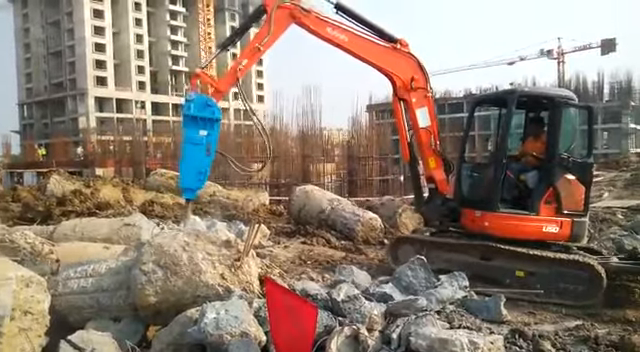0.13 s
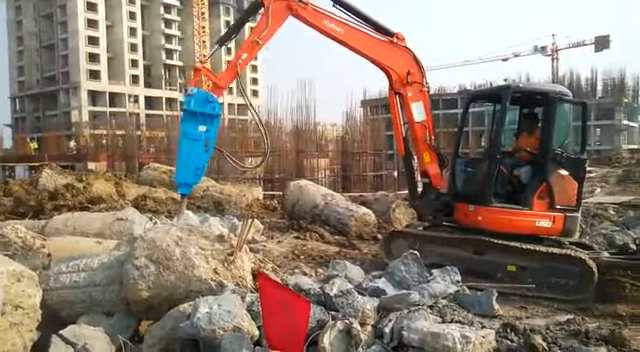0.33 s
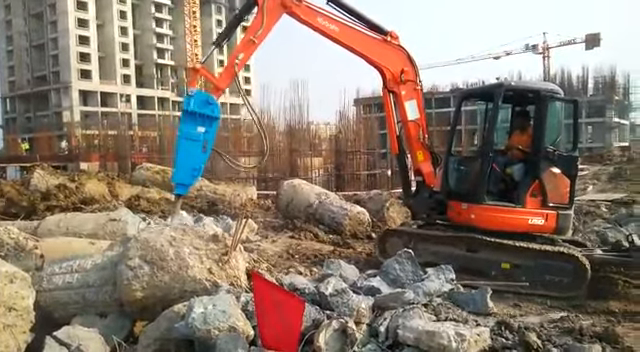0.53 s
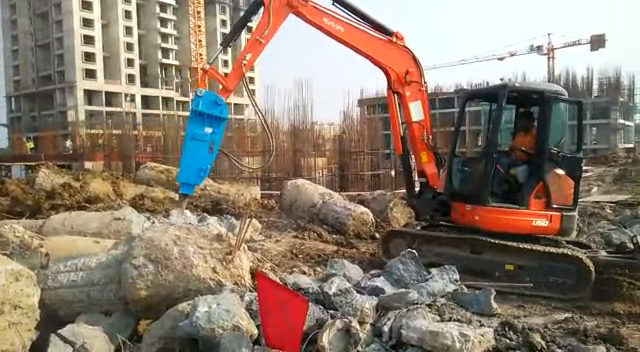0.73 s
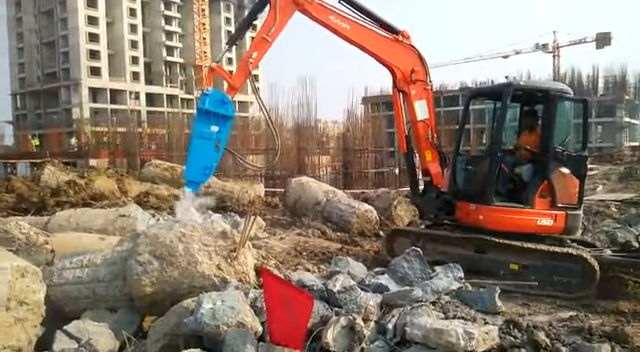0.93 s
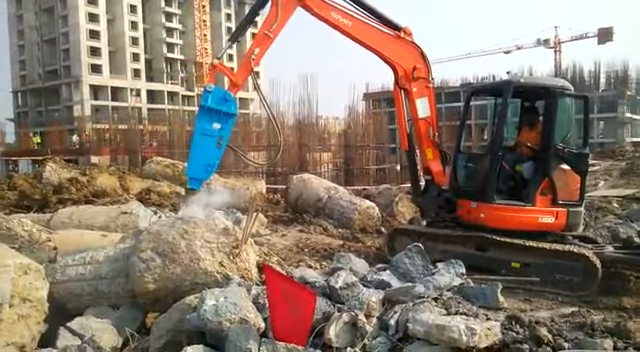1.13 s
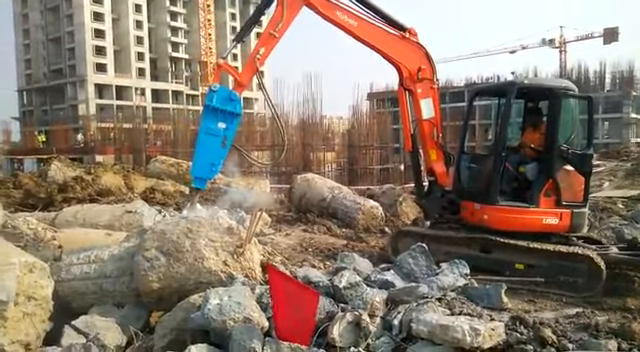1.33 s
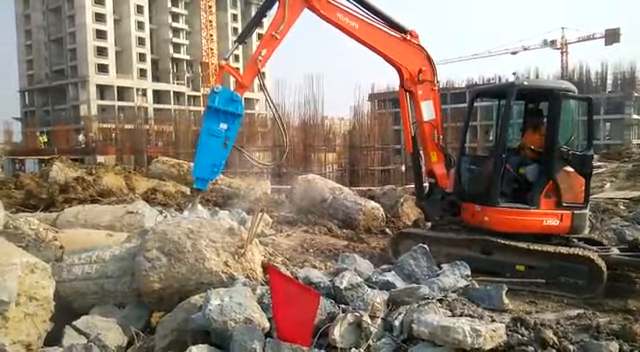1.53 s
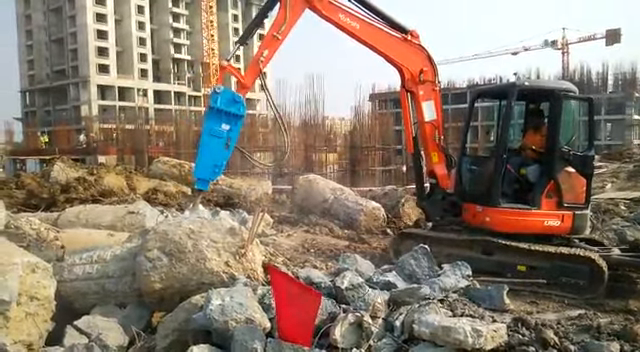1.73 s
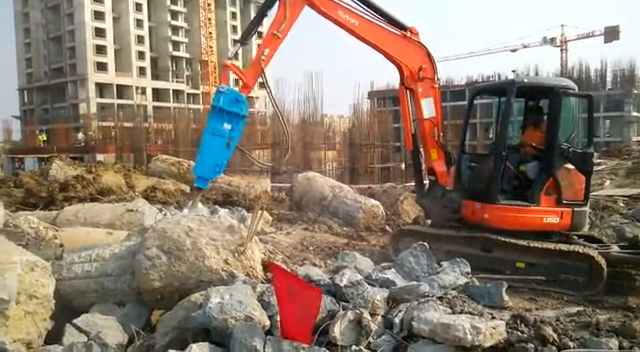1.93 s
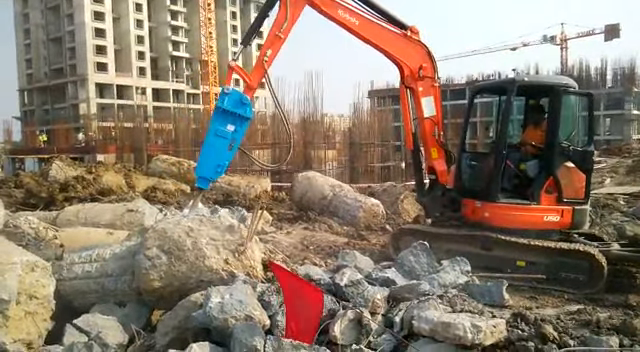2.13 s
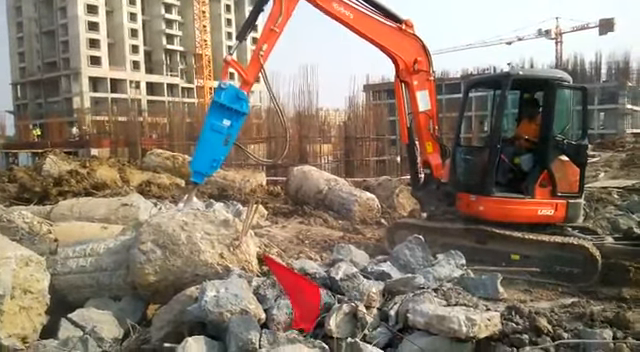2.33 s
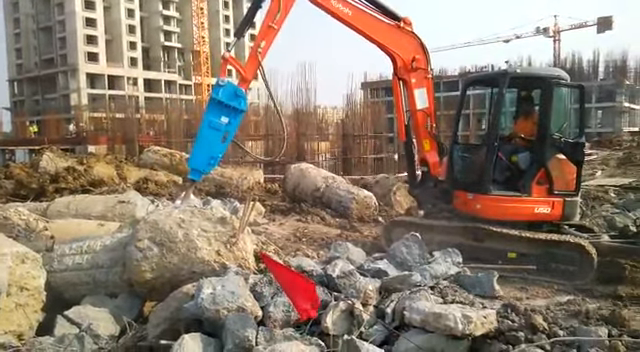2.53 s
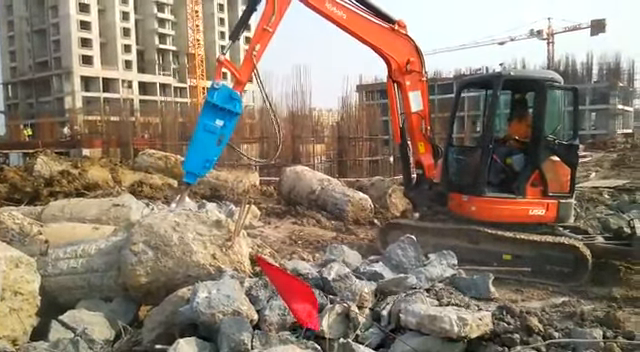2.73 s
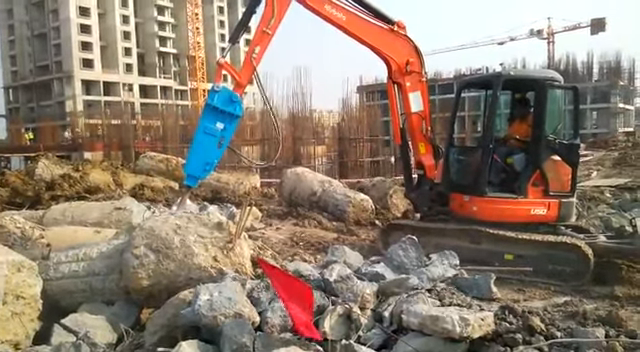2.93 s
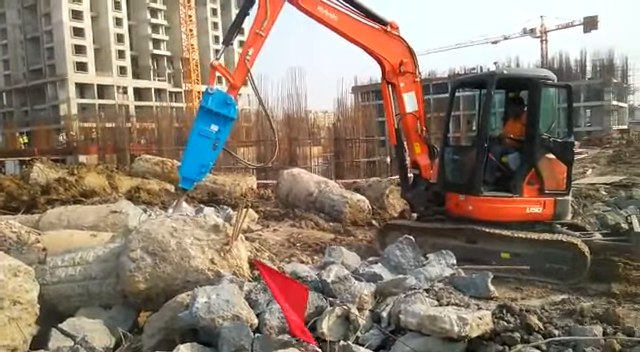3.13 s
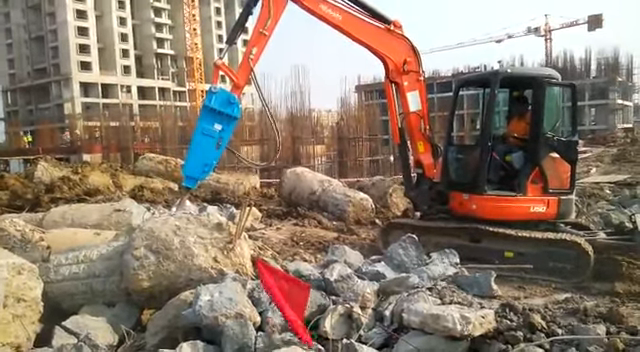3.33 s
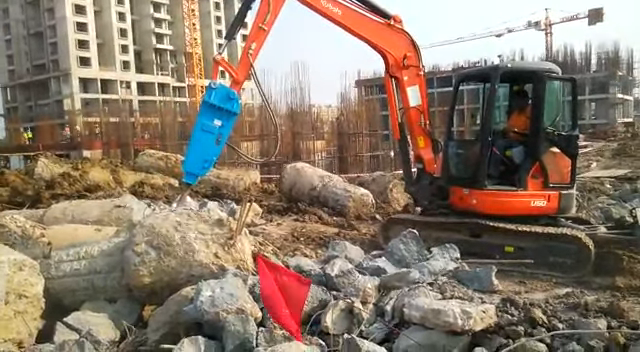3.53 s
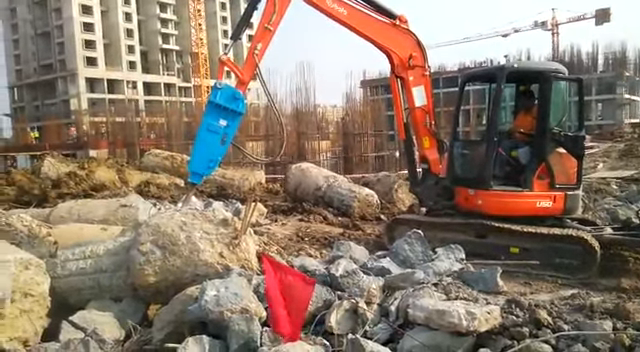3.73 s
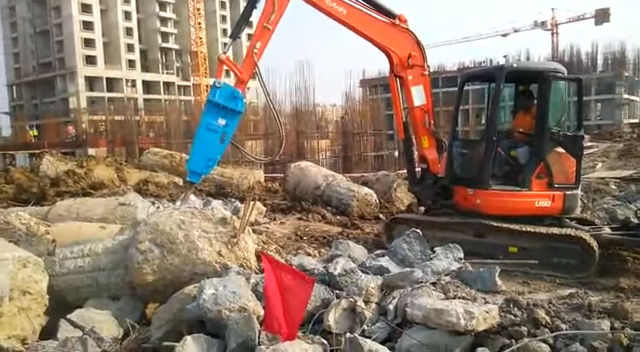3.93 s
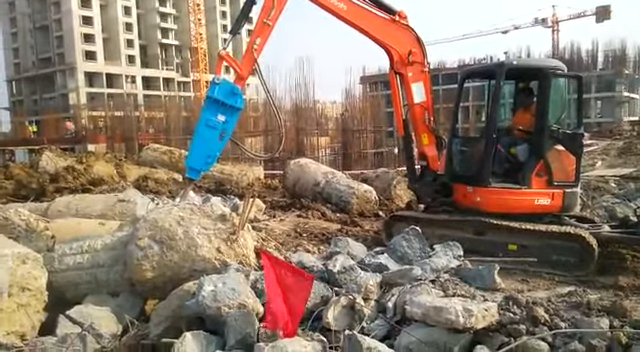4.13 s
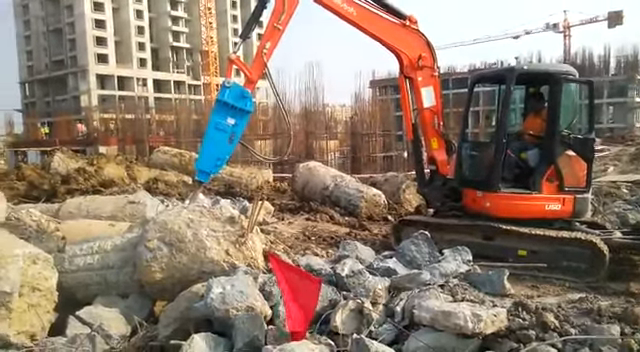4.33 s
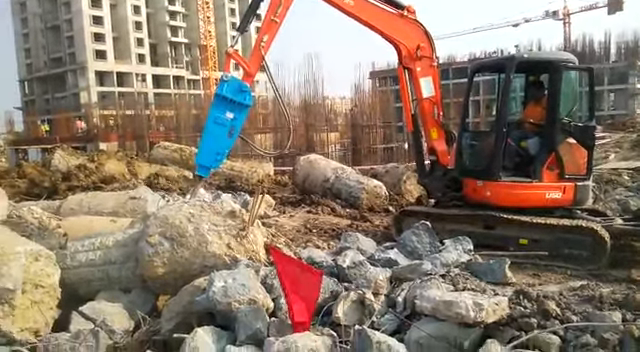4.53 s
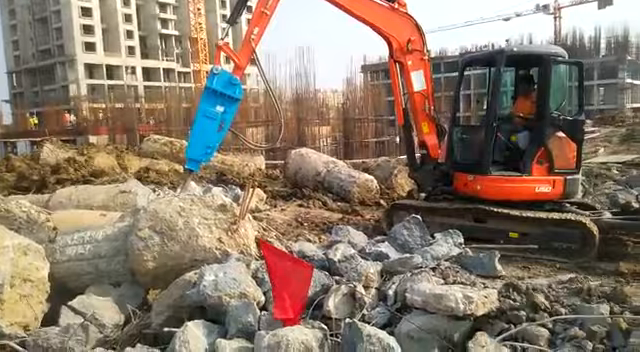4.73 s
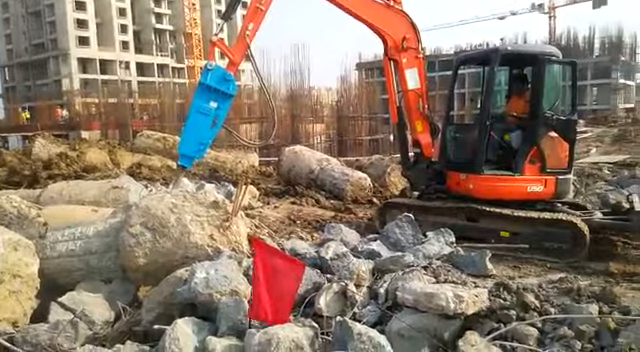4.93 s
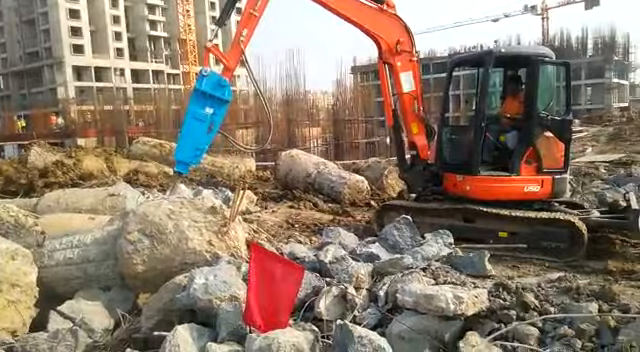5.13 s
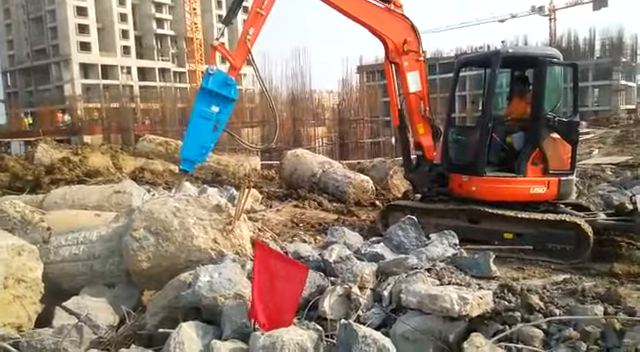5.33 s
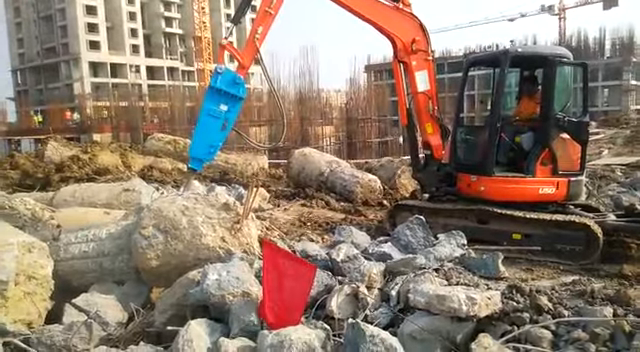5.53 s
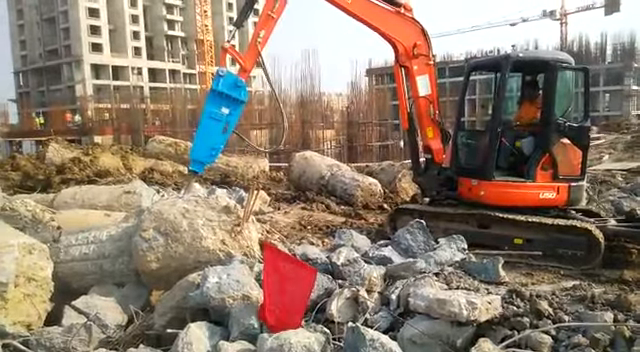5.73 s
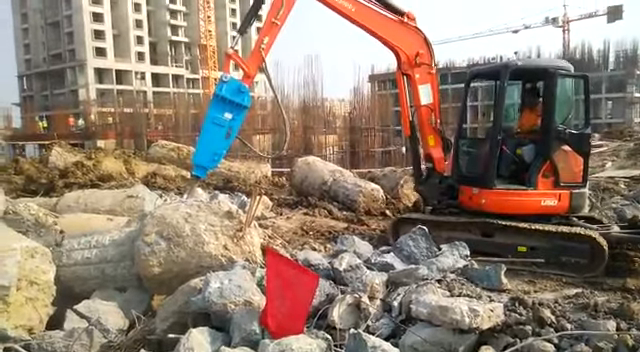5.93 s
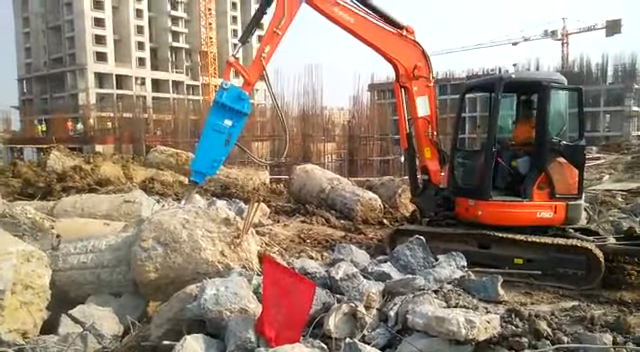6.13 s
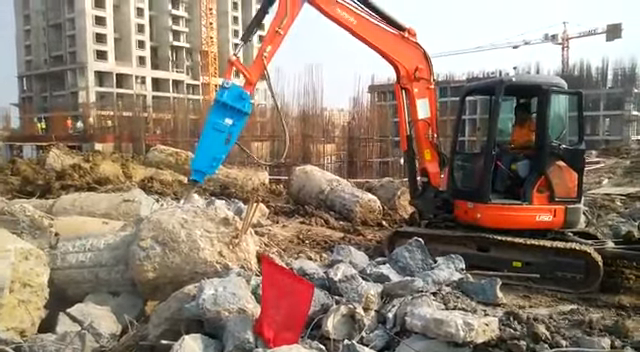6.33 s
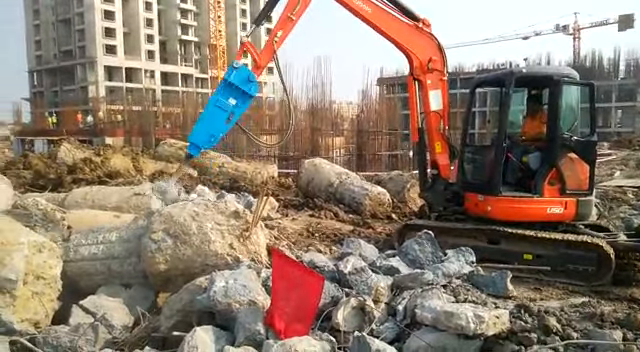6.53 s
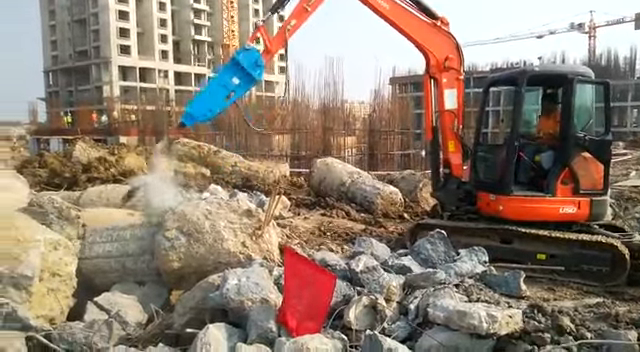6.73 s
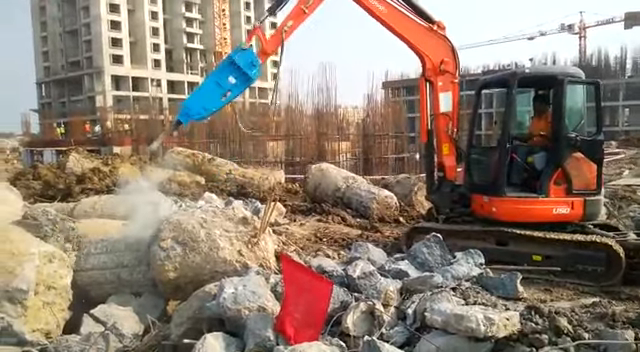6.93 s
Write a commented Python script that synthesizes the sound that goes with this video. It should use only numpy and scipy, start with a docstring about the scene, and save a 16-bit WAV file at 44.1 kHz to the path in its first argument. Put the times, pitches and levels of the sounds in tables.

```python
"""A hydraulic breaker hammers concrete: uneven volleys with skidding zings, falling chunks and knocks.
From 3.2 s it locks into a steady run, eases off after 5.3 s and stops at 5.8 s.
Each blow sums shaped noise (strike, rebound, clink, rattle, thud), decaying steel modes and chip clicks.
In the pause the diesel idles and the arm knocks; from 6.7 s the chisel slides off with two glancing blows.
Diesel, pump, oil and ground are filtered noise and sines; a short noise tail is the site's answer."""
import sys
import numpy as np
from scipy import signal
from scipy.fft import rfft, irfft, next_fast_len
from scipy.io import wavfile
from scipy.ndimage import map_coordinates

SR = 44100
rng = np.random.default_rng(int(sys.argv[2]) if len(sys.argv) > 2 else 0)


def wrap_up_sound(samples):
    """Save the sound to the file named by the first command line argument, as 16-bit audio."""
    columns = np.atleast_2d(samples).T
    # keep every value between -1 and 1, then stretch to whole-number steps
    tamed = np.clip(columns, -1, 1)
    steps = np.round(tamed * 32767).astype(np.int16)
    wavfile.write(sys.argv[1], SR, steps)


N = 311787
LENGTH = SR * 2 // 5  # samples in one event
AGE_S = np.arange(LENGTH) / SR

# piston volleys: (start [s], blows, first gap [s], change of gap per blow [s])
VOLLEYS = [(.004, 1, 0, 0), (.101, 4, .103, .0093), (.578, 3, .138, -.029), (.921, 5, .094, -.002),
           (1.38, 4, .101, -.008), (1.741, 4, .082, .0075), (2.116, 4, .105, -.006), (2.489, 1, 0, 0),
           (2.896, 3, .099, -.017), (3.157, 32, .07297, 0), (5.499, 3, .091, -.001), (5.786, 1, 0, 0)]
# chisel seating in the concrete: (time [s], seat [0-1])
SEAT = [(0, 0.1), (1.9, 0.08), (2.3, 0.08), (2.5, 0.9), (2.9, 0.91), (3.2, 1), (5.4, 1), (5.8, 1)]
# free ringing of the chisel as the surface crumbles: (time [s], ring [dB])
FREE_RING = [(0, -11.5), (.6, -19), (.9, -7.5), (1.1, 5), (1.5, 5.5), (1.9, 1), (2.15, -34), (2.5, 1),
             (2.9, -1), (3.2, -10), (5, -2), (5.8, -15)]
# bite of the tip on the rebound: (time [s], level [dB])
BITE = [(.1, -0.5), (.6, 0.7), (.87, 3), (1.15, -1), (1.5, -2.5), (2.4, 0), (3.3, 1.7), (4.3, 1.8)]
# casing plates ringing as the arm leans on them: (time [s], level [dB])
PLATE_RING = [(.1, 2.5), (.45, -1), (.85, -9), (1.3, -0.5), (2, 1.5), (2.9, -4.5), (3.5, -3.5), (5.2, -6)]
# casing plate modes: (frequency [Hz], relative level [dB], t60 [s], gain when seated [dB])
PLATE_MODES = [(234.4, -21.5, 0.29, 1), (348.7, -16.5, 0.27, -4), (467.3, -18.5, 0.63, 7),
               (563.1, -20.5, 0.24, 13), (730.7, -10, 0.094, 18.5), (785.3, 8.5, 0.14, -15),
               (797.4, -4.5, 0.28, 9.5), (997.6, -9.5, 0.27, 6), (1285, -18.5, 0.23, 13.5),
               (1400, -17, 0.19, 22), (1438, -10.5, 0.12, 19.5), (1503.6, -5, 0.14, 19.5),
               (1525, -13, 0.22, 18.5), (1753, -17.5, 0.07, 25.5), (1830, -5, 0.18, 4),
               (2220, -1.5, 0.088, 7), (2593, -3, 0.12, 5), (2842, -4, 0.13, 5.5)]
# chisel modes: (frequency [Hz], relative level [dB], t60 [s], share of free ringing [ratio])
CHISEL_MODES = [(2352, -10, .2, 1), (2467, -3, .25, 1), (4904, -10, .2, 1), (5032, -8, .2, .8),
                (5259, -2, .25, .8), (7075, -7, .2, .6), (7135, -8, .2, .2), (7372, -8, .18, .8),
                (9360, -8, .15, .6), (10403, -7, .2, .1), (14000, -14, .12, 0)]
# piston strike spectrum: (frequency [Hz], relative level [dB])
STRIKE_COLOUR = [(300, -14), (1000, 0), (2600, -2.5), (3300, -27), (3900, -6), (5100, 5.5), (6200, 2.5),
                 (7100, 7), (7800, 2.5), (9000, 4.5), (11200, 5.5), (12800, 1), (14100, -7.5)]
# rebound spectrum: (frequency [Hz], relative level [dB])
REBOUND_COLOUR = [(2500, -53), (3900, -17), (4300, 3.5), (5150, 2.5), (6200, 2), (7150, 14), (7850, 4.5),
                  (8600, 8), (10400, 9), (11600, 5), (13300, -3.5), (14100, -11.5)]
# chisel sleeve spectrum: (frequency [Hz], relative level [dB])
SLEEVE_COLOUR = [(3300, -78), (3560, -46), (3650, 13.5), (3880, 3), (3970, 3), (4200, -29)]
# casing rattle spectrum: (frequency [Hz], relative level [dB])
CASING_COLOUR = [(150, -39), (300, -4.5), (450, -2.5), (620, 6.5), (850, 8.5), (1200, 3.5), (1800, 2.5),
                 (2100, 1.5), (2600, 3), (3400, -3), (3750, -0.5), (3980, -8), (6000, -50)]
# boulder thud spectrum: (frequency [Hz], relative level [dB])
THUD_COLOUR = [(15, -45), (25, -38), (70, -16), (160, -12.5), (250, 3), (380, 7.5), (600, -4.5),
               (1500, -46)]
# glancing contact spectrum: (frequency [Hz], relative level [dB])
GLANCE_COLOUR = [(59, -67), (100, -46), (225, -23), (349, -4), (665, -4), (836, -3), (1190, -1), (2860, -4),
                 (3910, -20), (4330, -11.5), (5230, -13), (9970, -9), (14500, -22)]
# chisel sliding off: (time [s], level [dB], rise [s], t60 [s])
SLIPS = [(6.659, -24, 0.016, 0.12), (6.712, -14, 0.0013, 0.21), (6.791, -18, 0.0009, 0.23),
         (7.02, -57, 0.019, .5)]
# chisel skids: (time [s], level [dB], frequency [Hz], t60 [s])
ZINGS = [(.745, -17, 7380, .084), (.85, -16, 7500, 0.16), (0.939, -17.5, 7490, .4),
         (0.996, -25, 4820, 0.33), (1.046, -17, 7270, .22), (1.07, -25.5, 4770, 0.54),
         (1.136, -16.5, 7100, 0.16), (1.224, -15.5, 7100, 0.11), (1.51, -16.5, 5120, 0.15),
         (2.13, -12, 10450, 0.15), (2.15, -21, 7320, 0.21), (2.24, -18.5, 10530, 0.14),
         (2.25, -22.5, 7350, 0.19), (2.515, -17, 7100, 0.074)]
# loose stone, arm joints and the resonances of the glancing blows:
# (time [s], level [dB], frequency [Hz], width [Hz], t60 [s])
KNOCKS = [(2.655, -40, 3500, 91, 0.14), (2.755, -43, 300, 60, .49), (2.875, -33.5, 246, 50, 0.36),
          (5.956, -40, 4000, 500, .077), (5.985, -36.5, 187, 90, 0.18), (6.10, -44, 626, 70, 1),
          (6.117, -36, 344, 60, 0.3), (6.195, -33.5, 1060, 170, 0.15), (6.2, -34, 318, 120, 0.16),
          (6.258, -41, 1010, 170, .18), (6.385, -40, 189, 80, 0.37), (6.44, -35, 172, 55.3, 0.13),
          (6.445, -36, 560, 110, 0.16), (6.66, -21.5, 775, 68, 0.77), (6.664, -26, 1430, 90, .29),
          (6.712, -28, 310, 70, .2), (6.795, -24, 4510, 88.5, .12), (6.972, -26.5, 735, 260, 0.08),
          (6.974, -25, 1490, 690, 0.08)]
# broken chunks dropping: (time [s], level [dB])
CHUNKS = [(.77, -36), (.97, -35), (1.1, -30), (1.17, -30), (1.26, -30), (1.901, -36), (2.1, -39),
          (5.562, -32.5)]
# diesel, idling then taking up the arm's load: (time [s], level [dB])
ENGINE_LEVEL = [(6.3, -47), (6.6, -42.5), (6.72, -28.5), (6.95, -39), (7.07, -26)]
# diesel spectrum: (frequency [Hz], relative level [dB])
DIESEL_COLOUR = [(15, -89), (25, -73), (133, -26), (192, -34), (353, -4.5), (485, -34.5), (616, -13.5),
                 (824, -12.5), (1020, -18.5), (1290, -23), (3440, -23), (4250, -33), (14000, -62.5)]
# pump whine partials: (frequency [Hz], relative level [dB])
PUMP_PARTIALS = [(355, -16.5), (711, -5), (2444, -19.5), (3354, -16)]
# oil hiss spectrum: (frequency [Hz], relative level [dB])
OIL_COLOUR = [(2000, -8.5), (3400, -18), (6500, -19.5), (9500, 6.5), (12000, -26), (14000, -28.5)]
# arm moves: (start [s], length [s], pump whine [dB], oil hiss [dB])
ARM_MOVES = [(2.543, 0.059, -47.5, -78.5), (6.343, 0.16, -44.5, -69.5), (6.594, 0.3, -43, -45.5),
             (6.9, .17, -38, -81)]
# ground rumble spectrum: (frequency [Hz], relative level [dB])
GROUND_COLOUR = [(15, -58), (30, -34), (55, -30), (85, 0), (140, 1.5), (220, 5), (400, -16.5),
                 (1000, -61.5)]
# decay of the site's answer: (frequency [Hz], t60 [s])
SITE_DECAY = [(200, 0.67), (1000, 0.33), (4000, 0.24), (12000, 0.26)]
# left-right difference filter: (frequency [Hz], gain [dB])
SIDE_FILTER = [(2000, -84.5), (3300, -62), (4800, -36.5), (8500, -3), (14000, -5.5)]

# base levels, before pace, seat, bite and scatter
STRIKE_DB, REBOUND_DB, CASING_DB, THUD_DB = -12.5, -17, -19, -32
FULL_GAP_S, SLOWEST_GAP_S, WEAKER_DB_PER_S = 0.087, 0.15, 277  # longer gaps: softer strikes
SEAT_DAMPS_DB = 1.5  # a seated chisel steadies the casing
THUD_DB_PER_FREE_DB = 0.42  # a crumbling boulder thuds more
EASE_START_S, EASE_DB_PER_S = 5.32, 8  # the arm eases off
BLOW_SCATTER_DB, THUD_SCATTER_DB = 1.1, 0.5
REBOUND_DELAY_S, LOOSE_DELAY_S = 0.014, 0.0007  # after the strike; extra when loose
CHATTER_S, LOOSE_CHATTER_S = 0.0069, 0.02  # hold of the tip's chatter; extra when loose
SNAP_DB, SNAP_T60_S = 0.5, 0.0071  # hard first contact of the rebound, relative to its chatter
CHISEL_DETUNE_RATIO = 0.00355  # the load on the tip shifts its modes from blow to blow
ZING_WIDTH_HZ = 170
VALVE_RISE_S, VALVE_T60_S, IDLE_WHINE_DB, IDLE_HISS_DB = 0.02, 0.19, -79, -68.5
WHINE_WAVER_DB = 3
GROUND_DB, SHAKE_DB, SHAKE_T60_S, CHUNK_T60_S = -72.5, -57.5, 0.41, 0.2  # at rest; under blows; chunks
TOP_HZ = 14420  # band limit


def amp(db):
    """Decibels to gain."""
    return 10 ** (np.asarray(db) / 20)


def unit(x):
    """Scale to rms 1."""
    return x / np.sqrt(np.mean(x ** 2) + 1e-20)


def along(points, hz):
    """Interpolate (frequency, value) points on a log axis."""
    f, v = np.transpose(points)
    return np.interp(np.log(hz + 1), np.log(f + 1), v)


def at(rows, s):
    """The columns of a curve at the times s."""
    times, *cols = np.transpose(rows)
    return [np.interp(s, times, c) for c in cols]


def filtered(x, response):
    """Multiply the spectrum of x by a response of frequency."""
    size = x.shape[-1]
    m = next_fast_len(size + 4096)
    return irfft(rfft(x, m) * response(np.fft.rfftfreq(m, 1 / SR)), m)[..., :size]


def noise(colour, shape, ragged_db, grain_hz):
    """Coloured noise of rms 1; random bumps about grain_hz wide stand for many small resonances."""
    white = rng.standard_normal(shape)
    knots = rng.standard_normal(white.shape[:-1] + (2000,))

    def response(hz):
        place = np.minimum(hz / grain_hz, knots.shape[-1] - 2)
        k = place.astype(int)
        bumps = knots[..., k] * (k + 1 - place) + knots[..., k + 1] * (place - k)
        ragged = ragged_db * np.tanh(bumps) * np.minimum(hz / 2500, 1)  # smoother below 2500 Hz
        return amp(along(colour, hz) + ragged)

    return unit(filtered(white, response))


def wobble(rate_hz):
    """A smooth random curve through rate_hz knots a second."""
    knots = rng.standard_normal(int(N * rate_hz / SR) + 4)
    return map_coordinates(knots, [np.arange(N) * rate_hz / SR])


def burst(delay_s, rise_s, hold_s, t60_s):
    """An envelope that waits, rises, holds and decays exponentially."""
    t = np.maximum(AGE_S - delay_s, 0)
    return (1 - np.exp(-t / rise_s)) * amp(-60 * np.maximum(t - hold_s, 0) / t60_s)


def add(track, s, sound):
    """Mix a sound into a track at time s."""
    part = track[max(round(s * SR), 0):][:len(sound)]
    part += sound[:len(part)]


def dense_ring(colour, alike, ragged_db, grain_hz):
    """Countless close modes, a row per blow: the steel answers alike, the contact adds chance."""
    rows = noise(colour, (len(alike) + 1, LENGTH), ragged_db, grain_hz)
    share = np.clip(alike, 0, 1)[:, None]
    return np.sqrt(share) * rows[0] + np.sqrt(1 - share) * rows[1:]


def ring(hz, levels_db, t60_s, phase, scatter_db, slack_rad):
    """A few decaying sine modes; strength varies per blow, and phase through slack in the joints."""
    gains = amp(levels_db + scatter_db * rng.standard_normal(len(hz)))
    phase = phase + slack_rad * rng.standard_normal(len(hz))
    decay = amp(-60 * AGE_S / t60_s[:, None])
    return gains @ (decay * np.sin(2 * np.pi * hz[:, None] * AGE_S + phase[:, None]))


def resonances(rows, rise_s):
    """Each contact excites one broad resonance, made of filtered noise."""
    out = np.zeros(N)
    for s, db, hz, width_hz, t60_s in rows:
        white = rng.standard_normal(LENGTH)
        tone = filtered(white, lambda f: 1 / (1 + (2 * (f - hz) / width_hz) ** 2))
        shape = burst(0, rise_s, 2 * rise_s, t60_s)
        add(out, s, amp(db) * unit(tone * shape) * np.sqrt(np.mean(shape ** 2)))
    return out


def blow_times():
    """Within a volley each gap differs from the last by a fixed step."""
    return np.array([start + k * gap + k * (k - 1) / 2 * step
                     for start, count, gap, step in VOLLEYS for k in range(count)])


def blows():
    """Pace and contact set each blow: columns (time [s], strike, rebound, casing, thud [dB])."""
    s = blow_times()
    (seat,), (free_db,), (bite_db,) = at(SEAT, s), at(FREE_RING, s), at(BITE, s)
    gaps = np.pad(np.minimum(np.diff(s), SLOWEST_GAP_S), 1, mode="edge")
    slowness = np.maximum((gaps[:-1] + gaps[1:]) / 2 - FULL_GAP_S, 0)
    eased_db = EASE_DB_PER_S * np.maximum(s - EASE_START_S, 0)
    chance = rng.standard_normal((len(s), 3)).T
    weaker_db = np.maximum(WEAKER_DB_PER_S * slowness, eased_db)
    strike_db = STRIKE_DB - weaker_db + BLOW_SCATTER_DB * chance[0]
    rebound_db = REBOUND_DB + bite_db - eased_db + BLOW_SCATTER_DB * chance[1]
    casing_db = CASING_DB - SEAT_DAMPS_DB * seat + BLOW_SCATTER_DB * chance[2]
    thud_db = THUD_DB + THUD_DB_PER_FREE_DB * free_db + THUD_SCATTER_DB * chance[2]
    return s, strike_db, rebound_db, casing_db, thud_db


def strikes(seat):
    """The piston hits the chisel: bright dense ringing, more alike when seated."""
    return dense_ring(STRIKE_COLOUR, 0.3 + 0.35 * seat, 7, 160) * burst(-0.0017, 0.0027, 0.0037, 0.081)


def rebounds(seat, loose, back_s):
    """The chisel rebounds: a hard snap and chatter, held longer when loose."""
    hold_s = CHATTER_S + LOOSE_CHATTER_S * loose
    envelope = 0.73 * burst(back_s, 0.0025, hold_s, 0.22 - 0.056 * loose)
    chatter = dense_ring(REBOUND_COLOUR, 0.27 + 0.27 * seat, 12, 90.9) * envelope
    snap = dense_ring(STRIKE_COLOUR, 0.2 + 0.2 * seat, 6, 300) * burst(back_s, 0.0005, 0.003, SNAP_T60_S)
    return chatter + amp(SNAP_DB) * snap


def clinks(seat, loose, back_s):
    """The chisel clinks in its sleeve on the rebound, louder when loose."""
    clink = dense_ring(SLEEVE_COLOUR, 0.5 + 0.53 * seat, 16, 99)
    return clink * burst(back_s, 0.0014, 0.0062, 0.067) * amp(-28 + 8 * loose)


def rattles(seat, back_s):
    """The casing rattles at the strike and again at the rebound."""
    first = 0.76 * burst(0, 0.00073, 0.0087, 0.31)
    second = 0.37 * burst(back_s, 0.00081, 0.035, 0.13)
    return dense_ring(CASING_COLOUR, 0.059 + 0.5 * seat, 10, 70.1) * (first + second)


def thuds(seat):
    """The boulder thuds: low noise that rises late and slowly."""
    return dense_ring(THUD_COLOUR, 0.1 + 0.2 * seat, 1, 100) * burst(0.014, 0.01, 0.048, 0.26)


def hammer():
    """Each blow sums strike, rebound, clink, rattle and thud."""
    times, *levels_db = blows()
    strike, rebound, casing, thud = [amp(db)[:, None] for db in levels_db]
    seat, = at(SEAT, times)
    loose = np.clip(1 - seat, 0, 1)[:, None]
    back_s = REBOUND_DELAY_S + LOOSE_DELAY_S * loose
    sounds = strike * strikes(seat) + rebound * rebounds(seat, loose, back_s)
    sounds += clinks(seat, loose, back_s)
    sounds += casing * rattles(seat, back_s) + thud * thuds(seat)
    out = np.zeros(N)
    for s, sound in zip(times, sounds):
        add(out, s, sound)
    return out


def steel():
    """Chisel modes swell soon after the strike, casing plates after the rebound, each following contact."""
    plate_hz, plate_db, plate_t60_s, seated_db = np.transpose(PLATE_MODES)
    bar_hz, bar_db, bar_t60_s, freedom = np.transpose(CHISEL_MODES)
    plate_phase = rng.uniform(0, 2 * np.pi, len(plate_hz))
    bar_phase = rng.uniform(0, 2 * np.pi, len(bar_hz))
    out = np.zeros(N)
    for s, _, rebound_db, casing_db, _ in zip(*blows()):
        (seat,), (free_db,), (ring_db,) = at(SEAT, s), at(FREE_RING, s), at(PLATE_RING, s)
        plates = ring(plate_hz, plate_db + seat * seated_db, plate_t60_s, plate_phase,
                      scatter_db=2, slack_rad=0.42)
        shifted_hz = bar_hz * (1 + CHISEL_DETUNE_RATIO * rng.standard_normal(len(bar_hz)))
        bar = ring(shifted_hz, bar_db + free_db * freedom, bar_t60_s, bar_phase,
                   scatter_db=1.5, slack_rad=0.7)
        add(out, s, amp(casing_db + ring_db + 10) * plates * burst(0.015, 0.021, 0.042, 0.37))
        add(out, s, amp(rebound_db + 3.5) * bar * burst(0.006, 0.016, 0.045, 0.2))
    return out


def slips():
    """The chisel scrapes off the edge and fires twice into loose concrete: ragged noise bursts."""
    out = np.zeros(N)
    for s, db, rise_s, t60_s in SLIPS:
        crunch = noise(GLANCE_COLOUR, LENGTH, ragged_db=6, grain_hz=90)
        add(out, s, amp(db) * crunch * burst(0, rise_s, 2 * rise_s, t60_s))
    return out


def zings():
    """The chisel skids and zings: high resonances of equal width."""
    rows = [(s, db, hz, ZING_WIDTH_HZ, t60_s) for s, db, hz, t60_s in ZINGS]
    return resonances(rows, rise_s=0.0037)


def debris(chips_per_blow=24):
    """Every blow throws chips that click on the rubble, louder while the chisel rings freely."""
    out = np.zeros(N)
    age_s = AGE_S[:SR // 50]
    for s in blow_times():
        free_db, = at(FREE_RING, s)
        for flight, pitch, size in rng.uniform(size=(chips_per_blow, 3)):
            hz = 1500 * 8 ** pitch
            click = np.sin(2 * np.pi * hz * age_s) * np.exp(-hz * age_s / 7)  # a few cycles
            click_db = -26 + 0.66 * free_db + 11.3 * size ** 2 - 2 * flight
            add(out, s + 0.012 + 0.085 * flight, amp(click_db) * click)
    return out


def knocks():
    """Loose stone, arm joints and the glancing blows resonate: one damped resonance per row."""
    return resonances(KNOCKS, rise_s=0.0014)


def valves():
    """Whine and hiss gains: each arm move swells, holds and fades over the idle."""
    t = np.arange(N) / SR
    whine, hiss = amp(IDLE_WHINE_DB), amp(IDLE_HISS_DB)
    for start_s, length_s, whine_db, hiss_db in ARM_MOVES:
        age_s = np.maximum(t - start_s, 0)
        fade = amp(-60 * np.maximum(age_s - length_s, 0) / VALVE_T60_S)
        flow = (1 - np.exp(-age_s / VALVE_RISE_S)) * fade
        whine = whine + amp(whine_db) * flow
        hiss = hiss + amp(hiss_db) * flow
    return whine, hiss


def pump():
    """The pump whines: sine partials wavering together in pitch and separately in level."""
    turn_s = np.arange(N) / SR + np.cumsum(0.012 * wobble(40)) / SR
    return unit(sum(amp(db + WHINE_WAVER_DB * wobble(18)) * np.sin(2 * np.pi * hz * turn_s)
                    for hz, db in PUMP_PARTIALS))


def oil():
    """Oil hisses through the valves: ragged noise, its tones wavering by a varying read speed."""
    hiss = noise(OIL_COLOUR, N, ragged_db=10, grain_hz=70)
    return map_coordinates(hiss, [np.arange(N) + np.cumsum(0.0099 * wobble(7))], mode="mirror")


def excavator():
    """The diesel runs throughout as coloured noise; pump and oil swell when the arm moves."""
    engine_db, = at(ENGINE_LEVEL, np.arange(N) / SR)
    whine_gain, hiss_gain = valves()
    diesel = noise(DIESEL_COLOUR, N, ragged_db=9, grain_hz=50)
    return amp(engine_db + 1.6 * wobble(22)) * diesel + whine_gain * pump() + hiss_gain * oil()


def ground():
    """Low noise: faint at rest, shaken by every blow and thumped by falling chunks."""
    shake = np.full(N, amp(GROUND_DB))
    for s in blow_times():
        add(shake, s, amp(SHAKE_DB) * burst(0, 0.019, 0.022, SHAKE_T60_S))
    for s, db in CHUNKS:
        add(shake, s, amp(db) * burst(0, 0.0029, 0.013, CHUNK_T60_S))
    rumble = noise(GROUND_COLOUR, N, ragged_db=5.5, grain_hz=100)
    return shake * amp(2.7 * wobble(14)) * rumble


def site(x):
    """Rubble and buildings scatter the sound back: a decaying noise tail whose bass lasts longest."""
    hz, t, z = signal.stft(rng.standard_normal(LENGTH), SR, nperseg=256)
    decay = amp(-60 * t / along(SITE_DECAY, hz)[:, None])
    tail = signal.istft(z * decay, SR, nperseg=256)[1]
    return signal.fftconvolve(x, tail / np.linalg.norm(tail))[:N]


def spread(x, side_db):
    """A second draw of the blows, mostly treble, is added left and subtracted right."""
    side = amp(side_db) * filtered(hammer(), lambda hz: amp(along(SIDE_FILTER, hz)))
    return np.array([x + side, x - side])


def scene():
    """The breaker and its machine in the open building site."""
    work = hammer() + steel() + slips() + zings() + debris() + knocks() + ground()
    heard = work + amp(-11.5) * site(work) + excavator()
    return spread(heard, side_db=-3.5)


def record(dry):
    """Round the peaks that both channels share, then low-pass steeply."""
    mid = dry.mean(axis=0)
    rounded = dry - mid + mid / (1 + np.abs(mid / 0.75) ** 6) ** (1 / 6)
    return filtered(rounded, lambda hz: 1 / np.sqrt(1 + (hz / TOP_HZ) ** 360))


dry = scene()
out = record(dry)
wrap_up_sound(out)
```